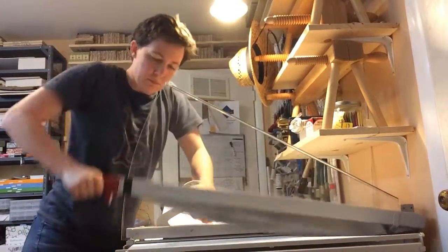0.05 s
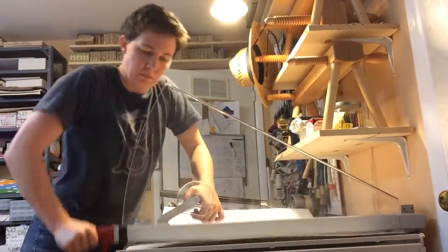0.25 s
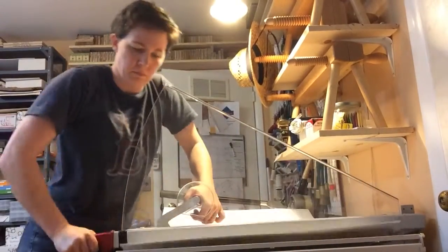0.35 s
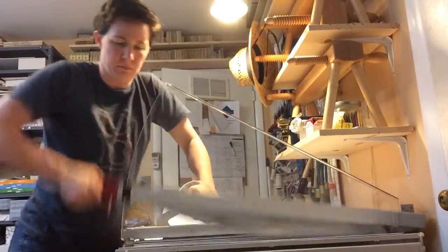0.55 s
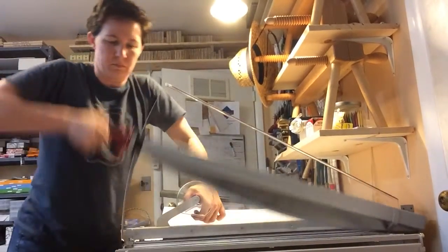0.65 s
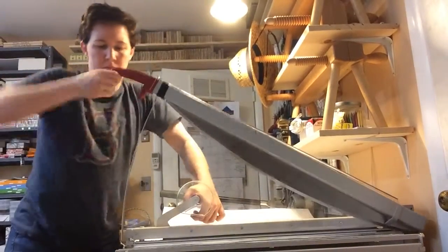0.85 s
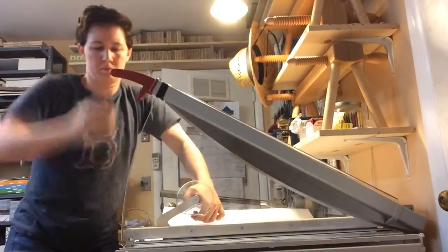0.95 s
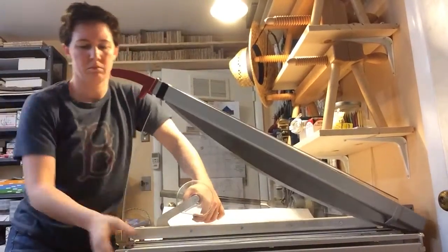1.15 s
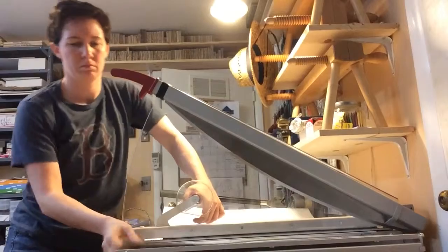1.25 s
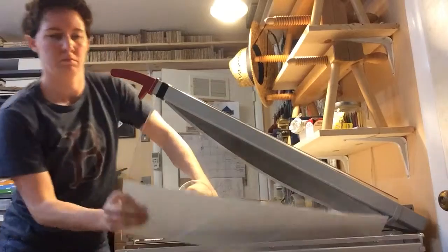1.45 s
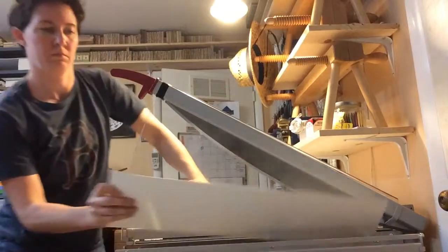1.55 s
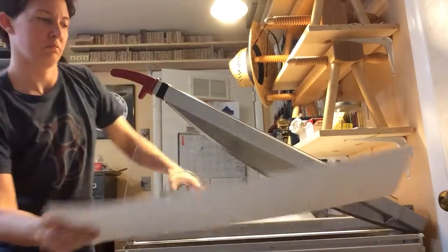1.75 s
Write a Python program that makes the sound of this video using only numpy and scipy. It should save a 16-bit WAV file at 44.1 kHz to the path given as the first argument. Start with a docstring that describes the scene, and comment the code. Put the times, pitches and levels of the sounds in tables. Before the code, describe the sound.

A lever paper cutter rasps through card over a low bench rumble and lands with a loud thud at about 0.4 seconds. From 0.55 seconds the blade scrapes back up, clicking free at 0.8. Around 1 second the lever knocks and rattles against its top stop. A hand pats the bed at 1.4 seconds, then the card faintly flexes and slides away until 1.8, in a small workshop.

```python
"""A lever paper cutter in a small workshop. Over a low bench rumble, the blade rasps through card,
snapping its fibres, and thuds onto the bench at about 0.4 s. It then scrapes back up along the
fixed steel edge and clicks free at 0.8 s. Around 1 s the lever hits its top stop and loose parts rattle.
At 1.4 s a hand pats the cutter's bed, and the cut card buckles, flexes and slides away."""
import sys
import numpy as np
from scipy import signal
from scipy.fft import rfft, irfft, next_fast_len
from scipy.io import wavfile

SR = 44100
rng = np.random.default_rng(int(sys.argv[2]) if len(sys.argv) > 2 else 0)


def master(y):
    """Save y as 16-bit WAV."""
    cut = np.clip(np.atleast_2d(y).T, -1, 1)
    pcm = np.round(cut * 32767)  # scale
    wavfile.write(sys.argv[1], SR, pcm.astype(np.int16))


N = 79380  # 1.8 s


def amp(db):
    """Turn decibels into a number to multiply by."""
    return 10 ** (np.asarray(db) / 20)


def unit(x):
    """Scale a sound to a standard strength (rms 1)."""
    return x / np.sqrt(np.mean(x ** 2) + 1e-20)


def along(points, hz):
    """Read between (frequency, value) points on a log frequency scale."""
    f, values = np.transpose(points)
    return np.interp(np.log(hz + 1), np.log(f + 1), values)


def gains(rows):
    """Turn each level column of a timed table into a volume curve."""
    times, *columns = np.transpose(rows)
    return [amp(np.interp(np.arange(N) / SR, times, db)) for db in columns]


def filtered(x, response):
    """Turn each frequency up or down by response(frequency)."""
    size = next_fast_len(N + SR // 2)
    return irfft(rfft(x, size) * response(np.fft.rfftfreq(size, 1 / SR)), size)[:N]


def coloured(x, tone):
    """Shape a sound's bass and treble with a tone table; rms 1."""
    return unit(filtered(x, lambda hz: amp(along(tone, hz))))


def noise(tone):
    """Steady noise with the given tone."""
    return coloured(rng.standard_normal(N), tone)


def resonate(x, peaks):
    """Make a sound ring at (frequency, width, level) peaks; narrow ones ring longer."""
    return unit(filtered(x, lambda f: sum(amp(db) * 1j * f * width / (hz * hz - f * f + 1j * f * width)
                                          for hz, width, db in peaks)))


def grains(per_s, spread_db):
    """Tiny random clicks; spread_db makes their sizes uneven."""
    size = amp(spread_db * np.minimum(rng.exponential(size=N), 5))
    return (rng.random(N) < per_s / SR) * size * rng.choice([-1, 1], N)


def since(s):
    """Seconds since time s, zero before it."""
    return np.maximum(np.arange(N) / SR - s, 0)


def strike(s, attack, t60):
    """Volume curve of a hit at time s: it rises fast, then fades 60 dB in t60 seconds."""
    t = since(s)
    return (1 - np.exp(-t / attack)) * amp(-60 * t / t60)


def burst(s, tone, attack, t60):
    """The noisy part of a hit, dying quickly."""
    return noise(tone) * strike(s, attack, t60)


def ring(s, notes, attack):
    """An object's own fading notes, struck a little differently each time."""
    t = since(s)[:round(s * SR) + SR // 2]
    ringing = sum(amp(db + 1.2 * rng.normal() - 60 * t / t60) * np.sin(2 * np.pi * hz * t)
                  for hz, db, t60 in notes)
    return np.pad(ringing * (1 - np.exp(-t / attack)), (0, N - len(t)))


def damped(notes):
    """Give notes their fade times: 0.22 s at 100 Hz, shorter higher up."""
    return [(hz, db, .22 * (hz / 100) ** -.35) for hz, db in notes]


# How loud the bench rumbles (t/s, level/dB)
RUMBLE_LEVEL = [(.07, -45), (.19, -55), (.245, -37.5), (.33, -47), (.56, -43.5), (.68, -50.5), (.8, -52),
                (1.33, -55), (1.5, -52), (1.56, -59.5)]
# Tones of the rumble and the room's air (f/Hz, level/dB)
RUMBLE_TONE = [(30, -11), (62, 4.5), (95, -6.5), (170, -4), (300, -30.5), (1000, -53)]
AIR_TONE = [(90, 0), (700, -10), (2000, -24), (6000, -34), (15500, -36)]

def background():
    """The bench rumbles as it is worked on, over the quiet air of the room."""
    rumble, = gains(RUMBLE_LEVEL)
    return rumble * noise(RUMBLE_TONE) + amp(-66) * noise(AIR_TONE)


# How hard the blade cuts (t/s, level/dB)
CUT_FORCE = [(0, -46), (.045, -49.5), (.05, -40.5), (.1, -33.5), (.19, -36.5), (.27, -31.5), (.32, -33),
             (.37, -35.5), (.42, -35), (.44, -61), (.47, -100)]
# Tone of tearing card (f/Hz, level/dB)
TEAR_TONE = [(60, -27.5), (140, -2), (210, -17.5), (300, -4.5), (600, -8.5), (950, -13.5), (2060, -14),
             (3500, -18.5), (7300, -27.5), (10600, -28), (15500, -46)]
# The blade's ring early and late in the cut (f/Hz, width/Hz, level/dB)
BLADE_EARLY = [(404, 22, 3), (3300, 400, -13)]
BLADE_LATE = [(402, 24, -4), (630, 55, 2), (775, 35, 1), (1090, 40, -5), (3020, 110, -3.5)]

def cut():
    """Fibres snap by the thousand and ring the blade, higher as the cut moves along it."""
    force, = gains(CUT_FORCE)
    fibres = lambda: grains(per_s=5000, spread_db=1)
    travel = (1 + np.tanh((np.arange(N) / SR - .235) / .035)) / 2  # goes from 0 to 1 around 0.235 s
    early = np.sqrt(1 - travel) * resonate(fibres(), BLADE_EARLY)
    late = np.sqrt(travel) * resonate(fibres(), BLADE_LATE)
    tear = coloured(fibres(), TEAR_TONE)
    return force * (tear + amp(-4) * (early + late) + amp(-9) * singing_edge())


# Pitch of the steel edge (t/s, f/Hz)
EDGE_PITCH = [(0, 1846), (0.102, 2071), (.48, 2540), (.63, 2137), (.9, 2020)]

def singing_edge(width_hz=65):
    """The edge sings higher as the contact runs towards the handle, lower on the way back."""
    hz = np.interp(np.arange(N) / SR, *np.transpose(EDGE_PITCH))
    jitter = rng.standard_normal(N) + 1j * rng.standard_normal(N)
    flutter = signal.lfilter([1], [1, -np.exp(-np.pi * width_hz / SR)], jitter)
    return unit(np.real(flutter * np.exp(2j * np.pi * np.cumsum(hz) / SR)))


# The blade's landings (t/s, level/dB)
LANDINGS = [(0.3852, -27), (0.3924, -12), (.427, -22.5), (0.478, -37)]
# Notes of the bench and bed (f/Hz, level/dB)
BENCH_NOTES = [(64, -3.5), (117, -1), (149, -1.5), (173, -1.5), (237, -13.5), (290, -12), (330, -13.5),
               (397, -7), (537, -7), (764, -11), (915, -15)]
# Tones of a landing and of the heavy blade's dull clunk (f/Hz, level/dB)
THUD_TONE = [(40, -13), (150, 3.5), (450, 0), (850, -9), (1300, -20.5), (1900, -16.5), (4000, -29),
             (10500, -39.5), (15500, -51)]
CLUNK_TONE = [(100, -9), (400, 1.5), (750, -2.5), (1300, -17), (6000, -42)]

def thud():
    """The last strip of card gives way; the blade lands and settles on the bench."""
    sound = amp(-21) * burst(.377, CLUNK_TONE, attack=.008, t60=.15)
    for s, db in LANDINGS:
        bench = ring(s, damped(BENCH_NOTES), attack=.0019)
        impact = amp(-1) * burst(s, THUD_TONE, attack=.00037, t60=.11)
        sound += amp(db) * (bench + impact)
    return sound


# Clacks of loose parts, plus faint ticks of handling and card (t/s, clack level/dB, tick level/dB)
CLACKS_AND_TICKS = [(0.486, -74, -59.5), (0.795, -40, -37.5), (0.968, -37, -77), (0.982, -31, -47),
                    (1.003, -34.5, -41.5), (1.0307, -26, -33), (1.053, -33, -35.5), (1.069, -26, -38),
                    (1.085, -30, -39.5), (1.1, -32, -57), (1.12, -32, -43.5), (1.14, -36, -64),
                    (1.2316, -60, -80), (1.3543, -65, -67.5)]
# Tones of a clack and a bright tick (f/Hz, level/dB)
CLACK_TONE = [(200, -0.5), (650, 4), (1250, -7), (1800, 1), (3400, -3), (5500, -10), (7500, -19),
              (15000, -27.5)]
TICK_TONE = [(1000, -27), (4000, 0), (7500, -8.5), (10000, 1), (12500, -5.5), (15500, -25)]

def clacks_and_ticks():
    """Clacks of loose parts, mostly at the top stop, plus faint ticks of handling and card."""
    return sum(amp(clack_db) * burst(s, CLACK_TONE, attack=.0006, t60=.1)
               + amp(tick_db) * burst(s, TICK_TONE, attack=.0003, t60=.065)
               for s, clack_db, tick_db in CLACKS_AND_TICKS)


# How loud the scrape and its hiss are (t/s, rub level/dB, hiss level/dB)
SCRAPE_LEVELS = [(.547, -91, -104), (.553, -48, -60), (.6, -44.5, -51), (.655, -40, -45.5),
                 (.69, -41, -51.5), (.725, -43.5, -50), (.78, -43, -57), (.82, -41.5, -51),
                 (.87, -46.5, -87), (.96, -52, -66), (.99, -76.5, -96)]
# Tones of the rub and the hiss (f/Hz, level/dB)
RUB_TONE = [(130, -29.5), (300, -3.5), (900, -14.5), (2000, -7.5), (5000, -16), (15000, -66)]
HISS_TONE = [(2500, -40), (5000, -3.5), (7300, -6.5), (9800, 0), (12000, -6.5), (15500, -21)]
# Ring of the rubbed edge (f/Hz, width/Hz, level/dB)
EDGE_RING = [(1653, 50, 4), (2904, 70, -1.5)]

def scrape():
    """Steel rubs on steel as the blade rises; the edge catches once and rings harder."""
    rub, hiss = gains(SCRAPE_LEVELS)
    slips = amp(-3) * coloured(grains(per_s=7000, spread_db=-2.5), RUB_TONE)
    catch_db = 10 * np.exp(-((np.arange(N) / SR - .657) / .018) ** 2)  # brief swell at 0.657 s
    edge = resonate(grains(per_s=6000, spread_db=3.5), EDGE_RING) + singing_edge()
    return rub * (slips + amp(catch_db - 13.5) * edge) + hiss * noise(HISS_TONE)


# The freed blade's ring and bright snap (f/Hz, width/Hz, level/dB)
STEEL_RING = [(1300, 160, 0), (2890, 45, 6), (4930, 50, 5), (5200, 3500, -16)]
SNAP_PEAK = [(9500, 2600, 0)]

def spring_free(s=.79):
    """The blade springs clear of the edge with a snap and rings briefly."""
    steel = resonate(rng.standard_normal(N), STEEL_RING) * strike(s, attack=.004, t60=.23)
    bright = resonate(resonate(rng.standard_normal(N), SNAP_PEAK), SNAP_PEAK)
    snap = bright * strike(s, attack=.0001, t60=.04)
    return amp(-38) * steel + amp(-28.5) * snap


# Deep sway of the frame (f/Hz, level/dB, fade time/s)
SWAY_NOTES = [(55, -8, .3), (80, 0, .2)]
# Knocks on the stop (t/s, frame level/dB, blade clunk level/dB)
KNOCKS = [(1.003, -26.5, -30.5), (1.021, -29.5, -27), (1.056, -30, -29.5), (1.083, -25.5, -27),
          (1.103, -25.5, -28.5), (1.122, -27, -30.5), (1.171, -33, -35), (1.194, -51.5, -36.5)]
# Notes of the lever and frame (f/Hz, level/dB)
FRAME_NOTES = [(75, -5), (116, -5.5), (178, -4), (240, -3.5), (298, 0), (430, -8.5), (560, -13.5)]

def top_stop():
    """The lever's weight runs into its top stop, sways the frame and knocks several times."""
    sound = amp(-17.5) * ring(.984, SWAY_NOTES, attack=.012)
    for s, frame_db, clunk_db in KNOCKS:
        sound += amp(frame_db) * ring(s, damped(FRAME_NOTES), attack=.00087)
        sound += amp(clunk_db) * burst(s, CLUNK_TONE, attack=.00116, t60=.063)
    return sound


# Notes of the cutter's bed (f/Hz, level/dB, fade time/s)
BED_NOTES = [(262, -2, .06), (310, 0, .06)]
# Tone of the hand's soft slap (f/Hz, level/dB)
PAT_TONE = [(70, 4), (350, -0.5), (1100, -20.5), (2000, -20), (3500, -37), (12000, -52)]

def pat(s=1.388):
    """A hand pats the bed, which rings for a moment."""
    bed = ring(s, BED_NOTES, attack=.0037)
    slap = amp(-8) * burst(s, PAT_TONE, attack=.0011, t60=.09)
    return amp(-28.5) * (bed + slap)


# The card's buckles (t/s, level/dB, f/Hz)
BUCKLES = [(1.443, -51.5, 810), (1.477, -49, 787)]
# Its flexes, and how loud it slides (t/s, level/dB)
FLEXES = [(1.482, -52.5), (1.524, -44.5), (1.563, -45), (1.598, -49.5), (1.776, -55.5)]
SLIDE_LEVEL = [(1.46, -100), (1.51, -67.5), (1.527, -54), (1.55, -70), (1.58, -66), (1.64, -60),
               (1.66, -70), (1.678, -57.5), (1.7, -65), (1.73, -79), (1.8, -75)]
# Tones of flexing and sliding (f/Hz, level/dB)
FLEX_TONE = [(100, -8), (700, -1.5), (1100, -13), (1800, -13.5), (3000, -19), (15000, -34.5)]
SLIDE_TONE = [(300, -21), (1500, -6.5), (7000, -8.5), (10000, -1.5), (13000, -7), (15500, -20)]

def card():
    """The card buckles with hollow plips, flexes as it is picked up and slides off the bed."""
    hollow = lambda hz: resonate(noise(FLEX_TONE), [(hz, 85, 0), (2 * hz, 85, -5)])
    plips = sum(amp(db) * hollow(hz) * strike(s, attack=.0019, t60=.18) for s, db, hz in BUCKLES)
    flexes = sum(amp(db) * burst(s, FLEX_TONE, attack=.0065, t60=.15) for s, db in FLEXES)
    slide, = gains(SLIDE_LEVEL)
    return plips + flexes + slide * coloured(grains(per_s=4500, spread_db=2), SLIDE_TONE)


# How long the echo lasts (f/Hz, fade time/s)
ECHO_FADE = [(1000, 0.31), (14000, 0.34)]
# Tone of the echo (f/Hz, level/dB)
ECHO_TONE = [(60, -19), (250, -1.5), (1000, -3), (10000, -8.5)]

def room(x):
    """Sound bounces around the cluttered workshop and soon dies away."""
    hz, t, bands = signal.stft(rng.standard_normal(SR // 2), SR, nperseg=256)
    fade = amp(-60 * t / along(ECHO_FADE, hz)[:, None])
    _, tail = signal.istft(bands * fade, SR, nperseg=256)
    delayed = np.pad(x, (SR // 250, 0))  # 4 ms
    echo = signal.fftconvolve(delayed, tail / np.linalg.norm(tail))[:N]
    return filtered(echo, lambda f: amp(along(ECHO_TONE, f)))


def scene():
    """Add up all the sounds and their echo, the same in both channels."""
    direct = cut() + thud() + scrape() + spring_free() + top_stop() + clacks_and_ticks() + pat() + card()
    mono = direct + amp(-7.5) * room(direct) + background()
    return np.array([mono, mono])


def record(dry):
    """Turn down the bass below 44 Hz and remove the treble above 15600 Hz."""
    thinned = signal.sosfilt(signal.butter(2, 44, "high", fs=SR, output="sos"), dry)
    return np.array([filtered(channel, lambda hz: hz < 15600) for channel in thinned])


dry = scene()
out = record(dry)
master(out)
```